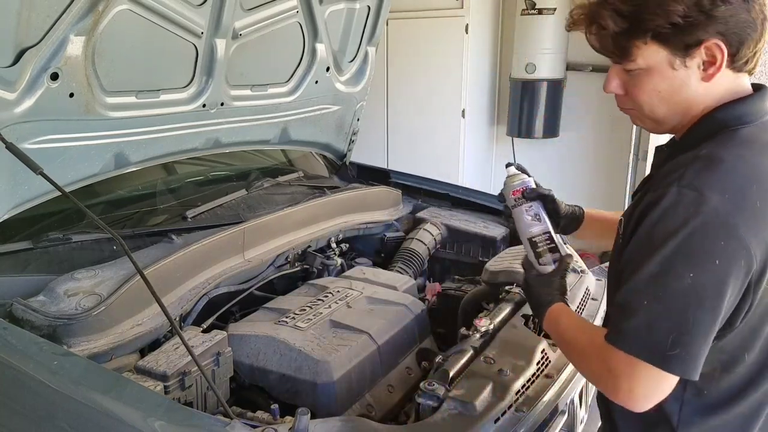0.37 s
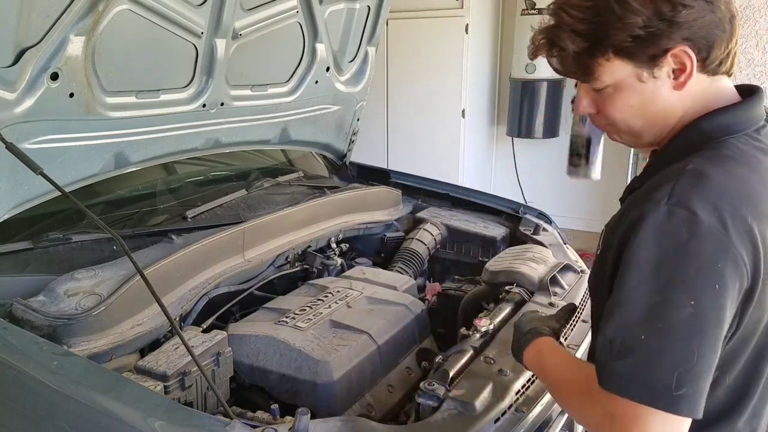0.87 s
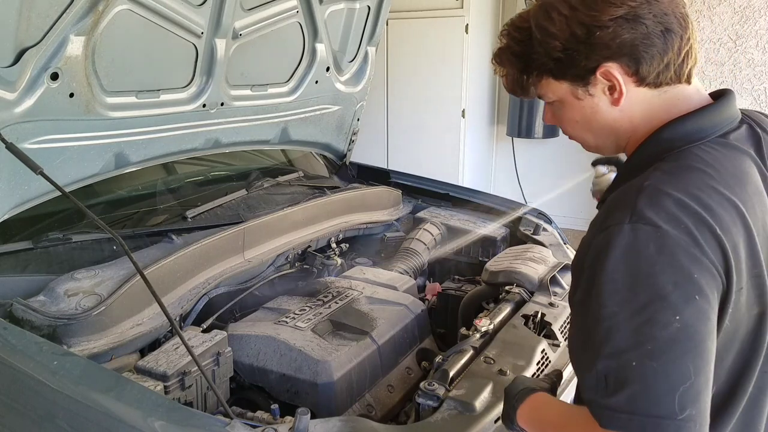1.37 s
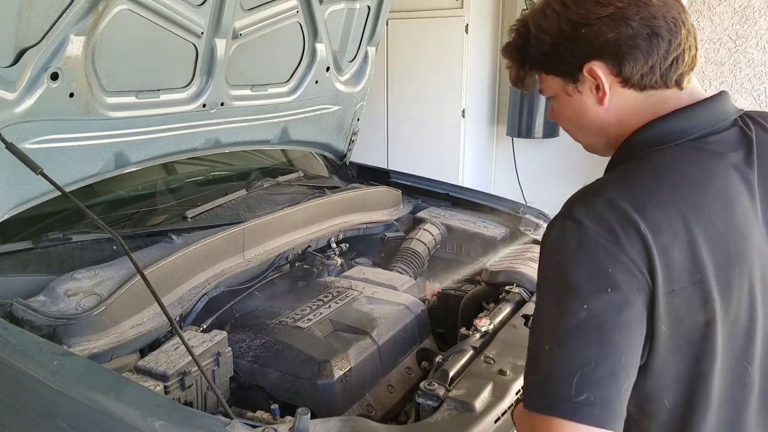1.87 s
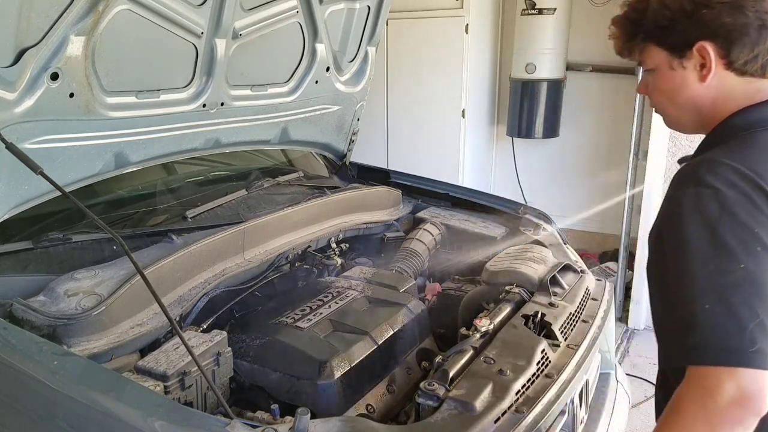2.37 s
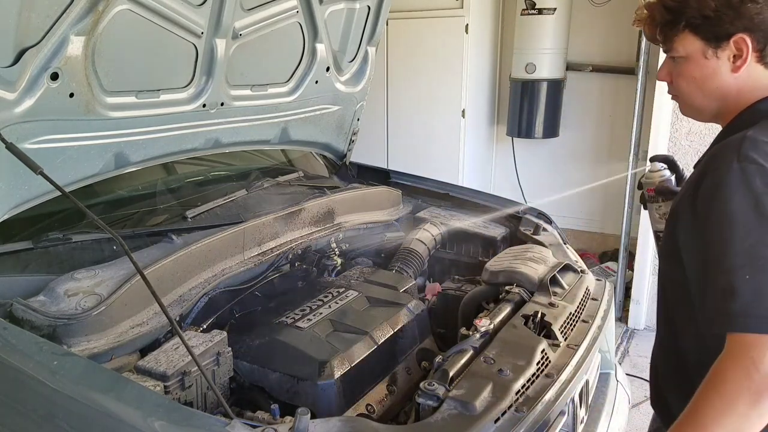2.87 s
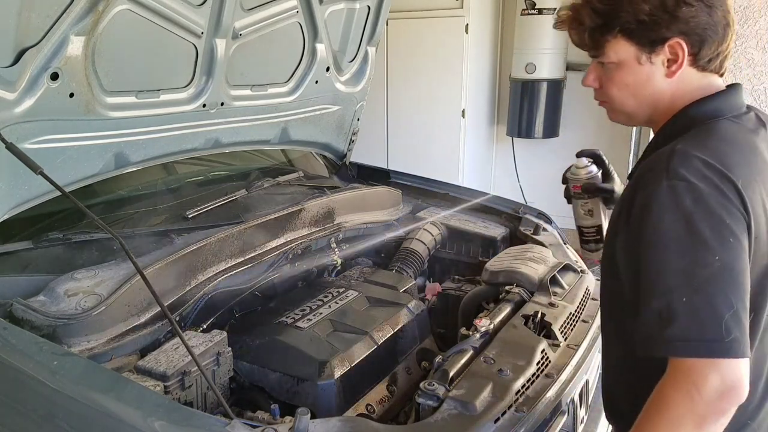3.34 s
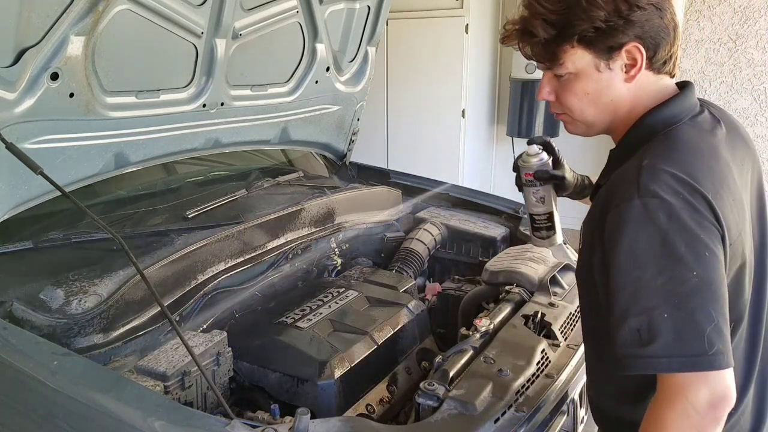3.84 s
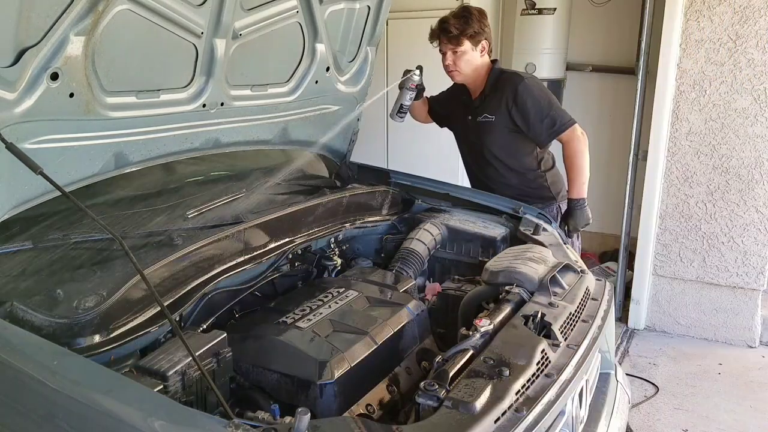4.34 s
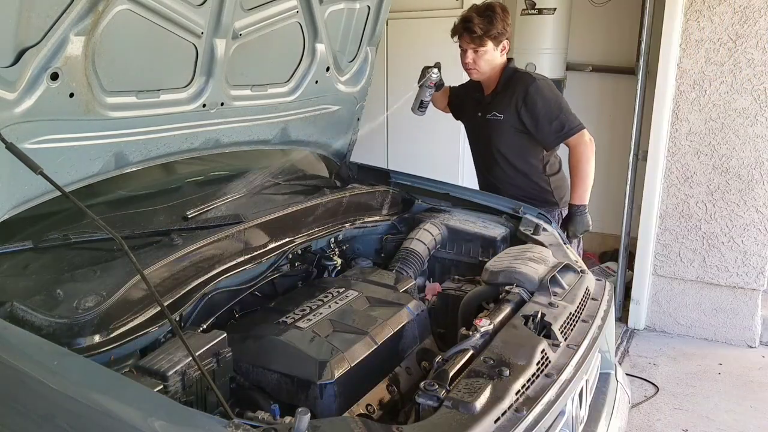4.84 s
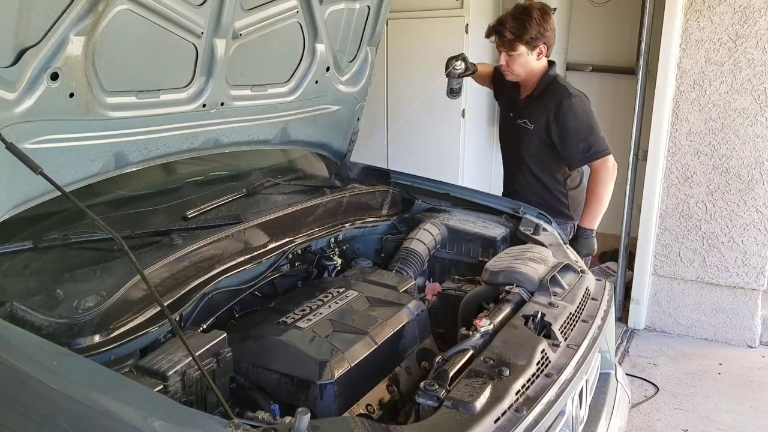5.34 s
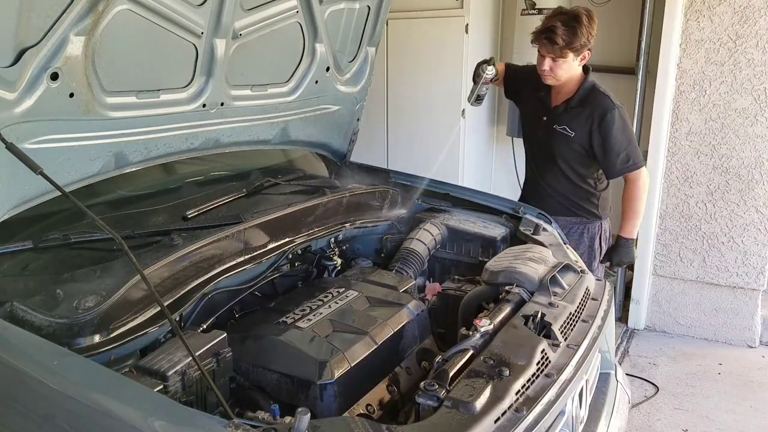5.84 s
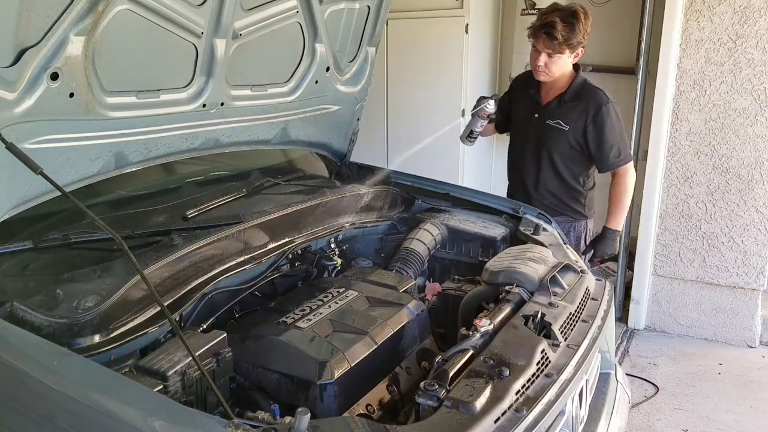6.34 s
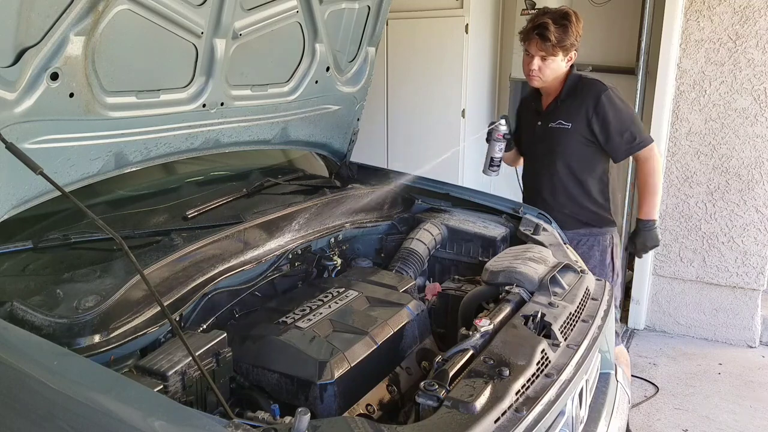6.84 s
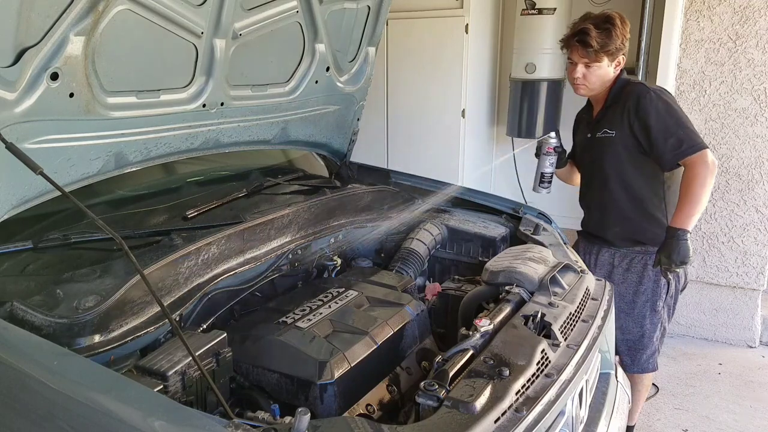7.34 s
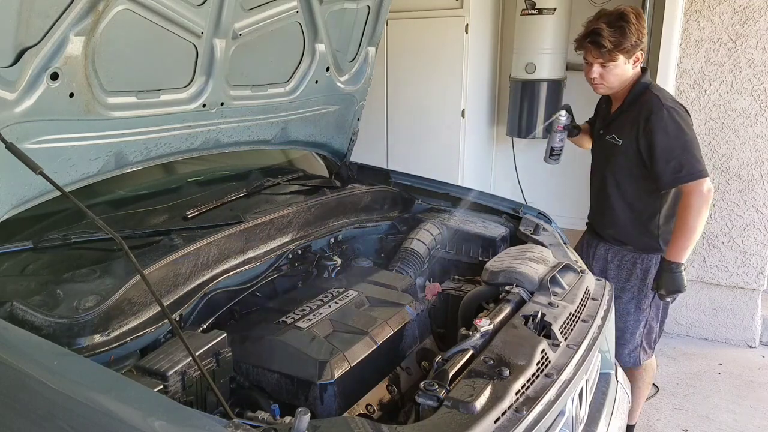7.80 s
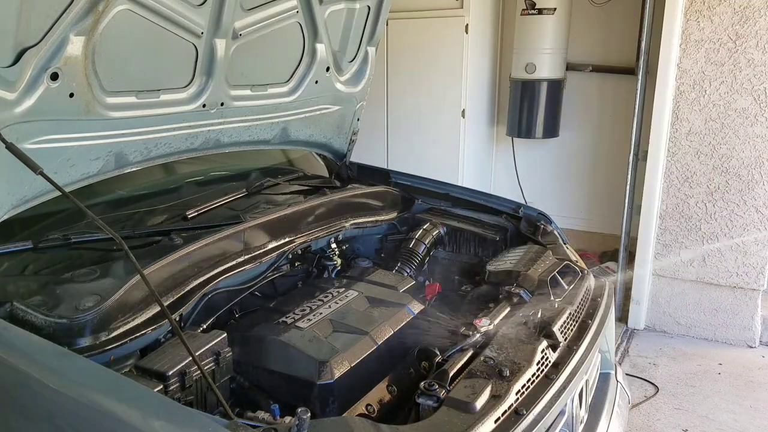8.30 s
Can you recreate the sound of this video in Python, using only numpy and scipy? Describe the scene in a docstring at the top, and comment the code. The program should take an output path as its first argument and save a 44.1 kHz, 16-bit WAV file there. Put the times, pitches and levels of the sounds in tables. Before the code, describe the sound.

Low distant traffic rumble and a faint motor hum fill an open garage, with a small scrape early on. After about a second and a half an aerosol can snaps on with a very high, airy hiss, leaning left, and droplets spatter over engine parts. The spray grows stronger, then abruptly drops softer past the middle and continues, unsteady, to the end. Close stereo pickup, little echo.

```python
"""Aerosol spray in an open garage

A can sprays a thin jet over a car engine: shaped noise hisses as the nozzle's turbulence, and fluctuating noise
bands spatter and drum as droplets striking metal and plastic. Resonant noise bursts make short scrapes.
Traffic is noise lifted at the garage's standing waves, over a fridge motor's faint harmonic hum and still air.
Delay, likeness and level between two microphone ports follow the can's aim; spray and traffic drop near 4.65 s.
"""
import sys
import numpy as np
from scipy import signal
from scipy.fft import rfft, irfft, next_fast_len
from scipy.io import wavfile
from scipy.ndimage import uniform_filter1d, map_coordinates

SR = 44100
rng = np.random.default_rng(int(sys.argv[2]) if len(sys.argv) > 2 else 0)


def put_to_file(sound):
    """Save the sound as 16-bit audio at rate SR, in the file named by the first command-line argument."""
    columns = np.atleast_2d(sound).T  # one column per channel
    safe = np.clip(columns, -1, 1)
    whole_steps = np.round(safe * 32767)
    wavfile.write(sys.argv[1], SR, whole_steps.astype(np.int16))


def elevation(decibels):
    """Turn decibel levels (scalar or array-like) into linear amplitude ratios."""
    levels = np.asarray(decibels, float)
    return 10 ** (levels / 20)


N = 383229  # samples

# distant traffic, before surges and wavering: start_s, boom_db, middle_drone_db, upper_drone_db
TRAFFIC_LEVELS = [(0.0, -43.5, -48, -40.5), (0.6, -44.5, -46, -44), (1.1, -46.5, -47.5, -47),
                  (1.55, -45, -49, -47.5), (1.9, -43, -48, -50.5), (2.75, -46, -51, -50),
                  (3.45, -47, -48, -50), (3.8, -46, -44.5, -47.5), (4.58, -46.5, -48.5, -47),
                  (4.7, -51, -56.5, -52), (6.5, -53.5, -61, -54), (7.2, -48, -57, -46),
                  (7.85, -44.5, -52, -53), (8.4, -46.5, -49, -46.5), (8.69, -45.5, -55, -53)]
# brief surges of the low boom: centre_s, lift_db
BOOM_SURGES = [(0, 9), (.27, 8.5), (.87, 10.5), (1.69, 6)]
# spectrum of the low boom: frequency_hz, relative_db
BOOM_SPECTRUM = [(10, -52), (22, -33), (36, -8), (42, -9), (60, -10), (100, -5.5), (122, -11.5), (140, -30),
                 (250, -90)]
# spectrum of the middle drone: frequency_hz, relative_db
MIDDLE_SPECTRUM = [(80, -60), (122, -9.5), (132, 3), (160, 1), (170, -20), (250, -74)]
# spectrum of the upper drone: frequency_hz, relative_db
DRONE_SPECTRUM = [(100, -51), (165, -17), (175, -12.5), (295, -14), (310, -18.5), (480, -24.5),
                  (700, -31.5), (1000, -39.5), (1600, -101)]
# standing waves of the garage: centre_hz, width_hz, lift_db
STANDING_WAVES = [(77.4, 27, 9), (143.3, 14, 9.5), (152.7, 9.6, 4.5), (180.4, 7.1, 4), (197.4, 18, 8),
                  (222, 18, 5.5), (269, 11.5, 4.5), (289, 12, 3), (404, 30, 4)]
# harmonics of the fridge motor: order (multiple of MOTOR_HZ), level_db (rms)
HUM_HARMONICS = [(1, -57.5), (2, -57), (4, -68), (5, -62), (6, -66), (7, -68.5), (8, -67)]
# spectrum of the still air: frequency_hz, relative_db
STILL_SPECTRUM = [(250, -9.5), (450, -6.5), (650, -11), (1000, -15.5), (1250, -18), (1450, -20.5),
                  (2800, -26.5), (3660, -31.5), (6700, -39), (8100, -38), (9500, -47), (11600, -35),
                  (14500, -35), (16000, -28)]
# balance of the garage sound: frequency_hz, left_minus_right_db
GARAGE_BALANCE = [(60, -2), (180, 0.15), (550, -0.47), (1650, -0.5), (4970, 1.1), (15000, 1.7)]
# likeness of diffuse sound at the ports, limited to 0-1 in use: frequency_hz, likeness
DIFFUSE_LIKENESS = [(60, 1.43), (110, 0.62), (200, 1.04), (380, 0.42), (700, 0.41), (1300, 0), (4000, 0)]
# short scrapes, likely shoes on concrete or the jet crossing an edge; level before the swell, width per resonator:
# start_s, length_s, level_db, centre_hz, width_hz, left_minus_right_db
SCRAPES = [(.598, 0.035, -52, 5960, 14000, 4), (.6, 0.013, -47.5, 900, 700, -2),
           (0.615, 0.06, -41.5, 2960, 3570, 2), (0.715, 0.049, -68, 6000, 12000, 2),
           (1.572, 0.047, -45, 473, 220, -1), (1.791, 0.044, -43, 2600, 1500, 5),
           (2.54, .05, -48, 2100, 2200, 0), (2.792, 0.04, -44.5, 2190, 500, 0),
           (2.935, 0.049, -49.5, 2600, 2000, 0), (3.131, 0.017, -43.5, 320, 200, -3),
           (3.14, 0.043, -46.5, 850, 1100, 1), (3.143, 0.042, -42.5, 2010, 1600, 4),
           (5.59, .09, -50, 1390, 1500, 1), (5.79, 0.099, -47, 2200, 2200, -1),
           (8.12, 0.064, -52, 2400, 1500, 2), (8.428, 0.032, -50, 2200, 1500, 1),
           (8.617, .05, -48, 2200, 2000, 1)]
# the nozzle's flow noise, before flutter: start_s, hiss_db, shoulder_db
NOZZLE_LEVELS = [(1.43, -29, -40), (2.27, -31, -42.5), (2.7, -31, -41.5), (3.48, -28, -39.5),
                 (3.6, -27, -39), (4.3, -26, -38.5), (4.6, -27, -36.5), (4.67, -33, -44),
                 (5.25, -31.5, -42.5), (5.49, -33, -45), (6.4, -31, -42), (7.25, -32.5, -43.5),
                 (7.5, -29.5, -42.5), (7.7, -30, -42.5), (7.9, -32, -41.5), (8.22, -31.5, -43),
                 (8.3, -36, -45), (8.69, -34.5, -44)]
# where the can points: start_s, left_delay_ms, direct_share (0-1), left_minus_right_db
CAN_AIM = [(1.4, 0.085, 0.25, 6.5), (2.4, 0.17, 0.05, 4.5), (2.9, 0.18, 0.1, 4.5), (3.3, 0.14, 0.6, 4.5),
           (4, 0.093, .45, 5), (4.6, 0.087, .4, 3), (4.7, 0.025, 0.26, 5.5), (5.5, 0.047, 0.37, 5),
           (6.1, 0.06, 0.55, 8), (7, 0.063, 0.36, 5), (7.7, 0.097, 0.84, 6), (8.15, 0.093, 0.25, 5),
           (8.35, 0.096, 0.2, 2), (8.7, 0.077, 0.1, 3)]
# spectrum of the nozzle's high hiss: frequency_hz, relative_db
HISS_SPECTRUM = [(8000, -45), (9500, -16), (11400, -2), (13800, 0.5), (14500, 1.5), (16000, -8)]
# spectrum of the hiss's lower shoulder: frequency_hz, relative_db
SHOULDER_SPECTRUM = [(4000, -29), (5500, -5.5), (6500, -3.5), (8000, 1), (9300, -2), (11000, 3),
                     (13000, -27)]
# where the jet lands, before clumping: start_s, spatter_db, hollow_drumming_db
SPATTER_LEVELS = [(1.43, -43, -50.5), (2.0, -45, -49), (2.4, -47, -49), (3.0, -46.5, -49.5),
                  (3.5, -45.5, -49.5), (4.6, -44, -50), (4.65, -51, -53.5), (5.56, -51, -52),
                  (5.63, -47, -46.5), (6.15, -46.5, -48), (6.21, -48.5, -54), (7.25, -48.5, -51.5),
                  (7.85, -45.5, -52.5), (8.35, -47.5, -50.5), (8.69, -51, -49.5)]
# spectrum of droplet impacts: frequency_hz, relative_db
DROP_SPECTRUM = [(900, -38), (1700, -6), (2400, -2.5), (2850, -3.5), (3050, -4.5), (5000, -3), (7000, -6),
                 (9000, -19.5)]
# spectrum of drumming covers and cavities: frequency_hz, relative_db
HOLLOW_SPECTRUM = [(300, -23), (600, -6.5), (900, -7.5), (1500, -9), (2200, -20)]
# treble colour of the two ports: frequency_hz, left_minus_right_db
PORT_BALANCE = [(5000, 0), (7000, -3), (8600, 5), (9600, -0.5), (11000, -2.5), (12600, 1), (14000, 2.5)]

SURGE_S, WAVER_DB = 0.036, 1.15  # surge half width at 1/e of its dB lift; random wavering of each traffic band
MOTOR_HZ, STILL_DB = 58.8, -52.5  # hum fundamental; level of the still air
VALVE_S = 1.42  # the button opens the valve
SWEEPS_PER_S, SWEEP_DB, SWEEP_PAN_DB = 7, 0.45, 1.3  # small wrist sweeps sway level and side
PARTS_PER_S, PARTS_DB = 9, 0.88  # the jet crosses parts that ring louder or softer
RIPPLE_DB = 2  # fine random unevenness of the spray's spectrum, slowly changing, separate at each port
TOP_HZ = 14530  # band limit of the recorder


def unit(x):
    """Normalization: a signal divided by its root mean square has rms 1."""
    return x / np.sqrt(np.mean(np.abs(x) ** 2) + 1e-20)


def along(points, hz):
    """Logarithmic frequency scale: values are interpolated along log frequency."""
    f, v = np.transpose(points)
    return np.interp(np.log(hz + 1), np.log(f + 1), v)


def curves(rows):
    """Linear interpolation: each column after the time becomes one value per sample."""
    s, *cols = np.transpose(rows)
    return [np.interp(np.arange(N) / SR, s, c) for c in cols]


def wobble(rate):
    """Band-limited fluctuation: a smooth curve through random knots, rate per second up to 200."""
    knots = rng.standard_normal(int(N * 200 / SR) + 4)
    coarse = np.arange(0, N, 32)
    curve = map_coordinates(knots, [coarse * min(rate, 200) / SR])
    return np.interp(np.arange(N), coarse, curve)


def filtered(x, response):
    """Linear filtering: the spectrum is multiplied by a response of frequency."""
    m = next_fast_len(x.shape[-1] + 8192)
    spectrum = rfft(x, m) * response(np.fft.rfftfreq(m, 1 / SR))
    return irfft(spectrum, m)[..., :x.shape[-1]]


def sides(db):
    """Power-preserving panning: db more on the left at equal total power."""
    gain = elevation([db / 2, -db / 2])
    return gain / np.sqrt(np.mean(gain ** 2, axis=0))


def rush(spectrum, patchy_db, direct=False, modes=()):
    """Interaural coherence: patchy stereo noise of rms 1, whose direct part is alike and late on the left."""
    noise = rng.standard_normal((2, N), dtype=np.float32)
    hz, t, z = signal.stft(noise, SR, nperseg=512)
    patches = uniform_filter1d(rng.standard_normal(z.shape[1:]), size=5, axis=0)
    patches = uniform_filter1d(patches, size=10, axis=1)
    ripple = unit(uniform_filter1d(rng.standard_normal(z.shape), size=60, axis=2))
    ripple_db = bool(direct) * RIPPLE_DB * ripple

    s, lag_ms, share, _ = np.transpose(CAN_AIM)
    straight = direct * np.interp(t, s, share)
    alike = np.maximum(along(DIFFUSE_LIKENESS, hz)[:, None], straight)
    alike = np.clip(alike, 0, 1)
    left = alike * z[1] + np.sqrt(1 - alike ** 2) * z[0]
    if direct:
        frame = np.minimum((t * SR).astype(int), N - 1)
        sway_ms = 0.008 * wobble(8)[frame]  # the hand never holds still
        delay_s = (np.interp(t, s, lag_ms) + sway_ms) / 1000
        left = left * np.exp(-2j * np.pi * hz[:, None] * delay_s)

    gain = elevation(patchy_db * unit(patches) + ripple_db).astype(np.float32)
    pair = signal.istft(np.array([left, z[1]]) * gain, SR, nperseg=512)[1][:, :N]

    def response(f):
        lift_db = sum(db / (1 + (2 * (f - c) / w) ** 2) for c, w, db in modes)
        return elevation(along(spectrum, f) + lift_db)

    return unit(filtered(pair, response))


def traffic():
    """Room resonance: standing waves lift wavering bands of distant traffic noise."""
    boom_db, middle_db, drone_db = curves(TRAFFIC_LEVELS)
    t = np.arange(N) / SR
    surge_db = sum(db * np.exp(-((t - s) / SURGE_S) ** 2) for s, db in BOOM_SURGES)
    bands = [(boom_db + surge_db, BOOM_SPECTRUM), (middle_db, MIDDLE_SPECTRUM), (drone_db, DRONE_SPECTRUM)]
    out = np.zeros((2, N))
    for db, shape in bands:
        level = elevation(db + WAVER_DB * wobble(5))
        out += level * rush(shape, patchy_db=0.6, modes=STANDING_WAVES)
    return out


def motor_hum():
    """Harmonic series: a rotating motor radiates multiples of one slightly unsteady frequency."""
    turn = 2 * np.pi * MOTOR_HZ * np.arange(N) / SR + 0.35 * wobble(5)  # radians
    out = np.zeros(N)
    for order, db in HUM_HARMONICS:
        level = elevation(db + 1.0 * wobble(7)) * np.sqrt(2)  # rms to peak
        out += level * np.sin(order * turn + 7 * rng.random())
    return out


def garage():
    """Superposition: traffic through the open door, motor hum and still air add linearly."""
    still = elevation(STILL_DB) * rush(STILL_SPECTRUM, patchy_db=1.0)
    return filtered(traffic() + motor_hum() + still, lambda hz: sides(along(GARAGE_BALANCE, hz)))


def scuffs():
    """Stick-slip friction: a gritty drag excites one resonance, then fades in the garage."""
    out = np.zeros((2, N + SR))
    t = np.arange(SR // 3) / SR
    for s, length, db, hz, width, pan_db in SCRAPES:
        progress = np.clip(t / length, 0, 1)
        drag = np.abs(np.sin(np.pi * progress)) ** 0.55
        echo = elevation(-7) * progress ** 2 * elevation(-60 * t / 0.5)  # decays 60 dB per half second
        grit = rng.standard_normal((4, len(t)))
        catches = elevation(0.74 * unit(uniform_filter1d(grit[3], size=130)))  # the contact sticks and slips

        def ring(f):
            return (1j * f * width / (hz * hz - f * f + 1j * f * width)) ** 2

        pair = unit(filtered(0.6 * grit[0] + grit[1:3], ring))  # grit[0] is common to both ports
        scrape = (drag * catches + echo) * pair
        out[:, round(s * SR):][:, :len(t)] += elevation(db) * sides(pan_db)[:, None] * scrape
    return out[:, :N]


def valve():
    """Flow onset: gas starts almost at once and fills out exponentially over the first moments."""
    t = np.maximum(np.arange(N) / SR - VALVE_S, 0)
    return (1 - np.exp(-t / 0.0013)) * (1 - 0.33 * np.exp(-t / 0.03))


def nozzle():
    """Jet turbulence: gas at a small orifice radiates broad noise, fluttering with uneven liquid feed."""
    hiss_db, shoulder_db = curves(NOZZLE_LEVELS)
    pan_db = curves(CAN_AIM)[-1] + SWEEP_PAN_DB * wobble(SWEEPS_PER_S)
    feed_db = 0.2 * wobble(14) + 0.66 * wobble(150)
    hiss_gain = elevation(hiss_db + feed_db + SWEEP_DB * wobble(SWEEPS_PER_S)) * sides(pan_db)
    hiss = hiss_gain * rush(HISS_SPECTRUM, patchy_db=1.8, direct=1)
    body_gain = elevation(shoulder_db + feed_db + SWEEP_DB * wobble(SWEEPS_PER_S)) * sides(0.74 * pan_db)
    body = body_gain * rush(SHOULDER_SPECTRUM, patchy_db=1.06, direct=0.25)
    return valve() * (hiss + body)


def spatter():
    """Impact excitation: uneven droplets strike the engine, and covers and cavities drum beneath."""
    drops_db, hollow_db = curves(SPATTER_LEVELS)
    clumps_db = 0.62 * wobble(120) + 0.84 * wobble(20)
    ticks_gain = elevation(drops_db + clumps_db + PARTS_DB * wobble(PARTS_PER_S))
    ticks = ticks_gain * rush(DROP_SPECTRUM, patchy_db=1.5, direct=0.36)
    drum_gain = elevation(hollow_db + 1.4 * clumps_db + PARTS_DB * wobble(PARTS_PER_S))
    drum = drum_gain * rush(HOLLOW_SPECTRUM, patchy_db=2.0)
    return valve() * (ticks + drum)


def scene():
    """Superposition: the pressures of all sources add at the two ports."""
    return garage() + scuffs() + nozzle() + spatter()


def band_limit(x):
    """A steep low-pass at the top of the band."""
    return signal.sosfilt(signal.butter(12, 15870, fs=SR, output="sos"), x)


def record(dry):
    """Frequency response: each port colours the treble, and the recorder cuts steeply above TOP_HZ."""
    ports = filtered(dry, lambda hz: sides(along(PORT_BALANCE, hz)))
    mix = filtered(ports, lambda hz: 1 / (1 + np.exp(np.clip((hz - TOP_HZ) / 12, -50, 50))))
    return band_limit(mix)


dry = scene()
out = record(dry)
put_to_file(out)
```